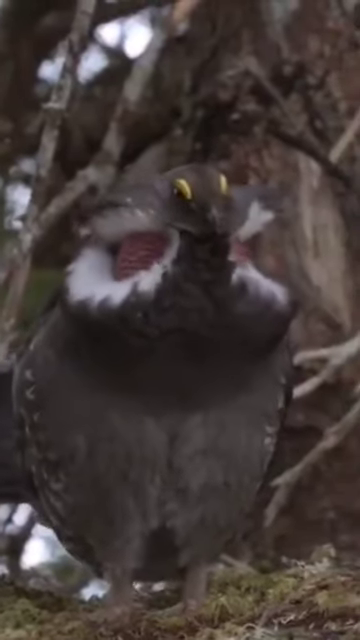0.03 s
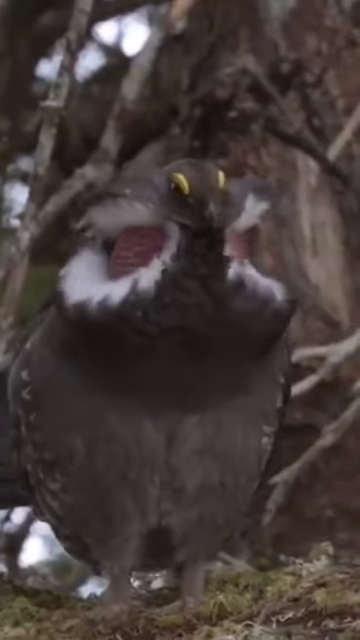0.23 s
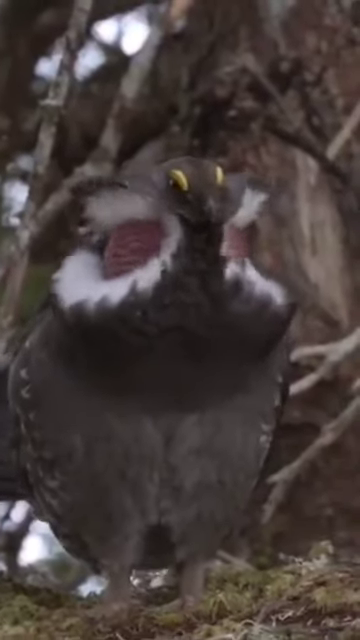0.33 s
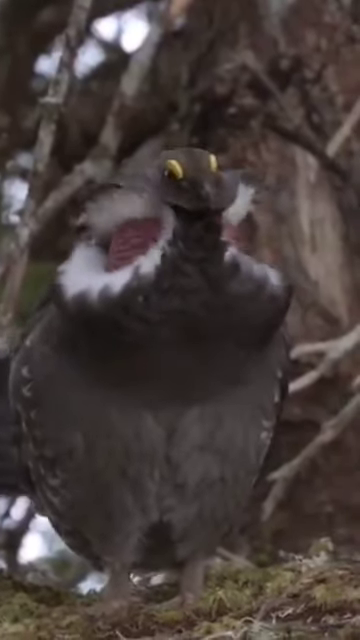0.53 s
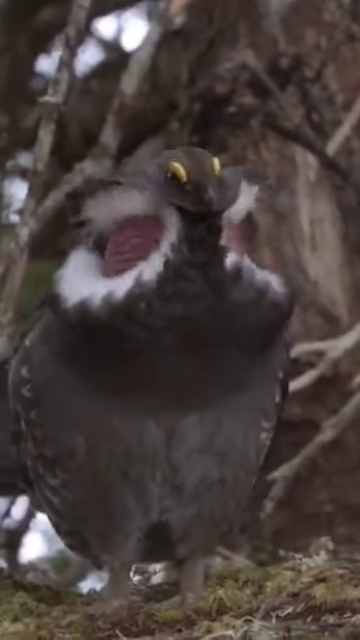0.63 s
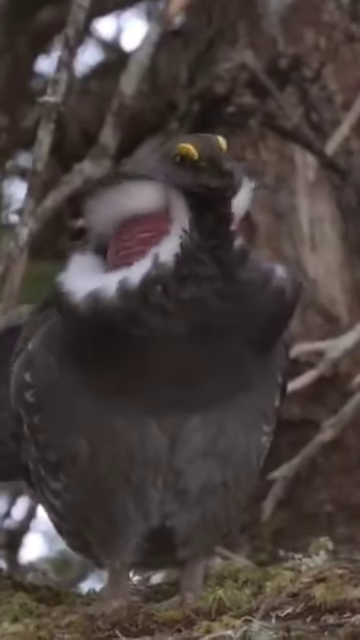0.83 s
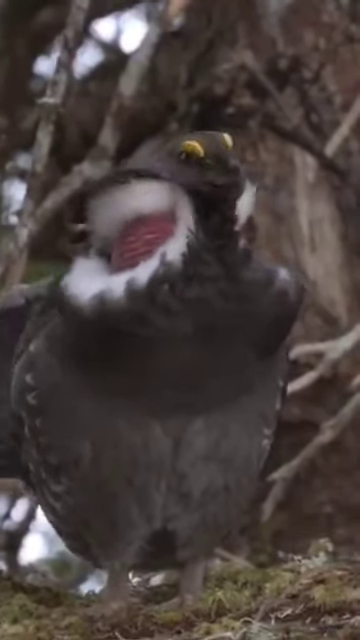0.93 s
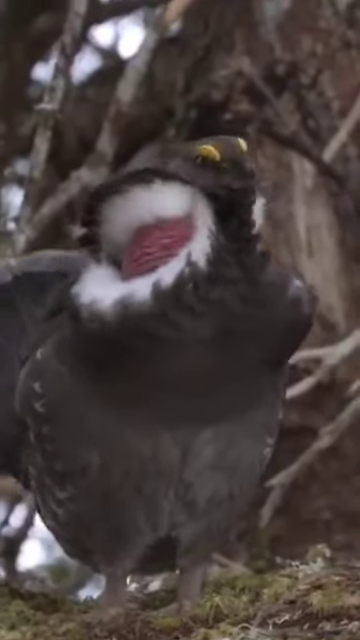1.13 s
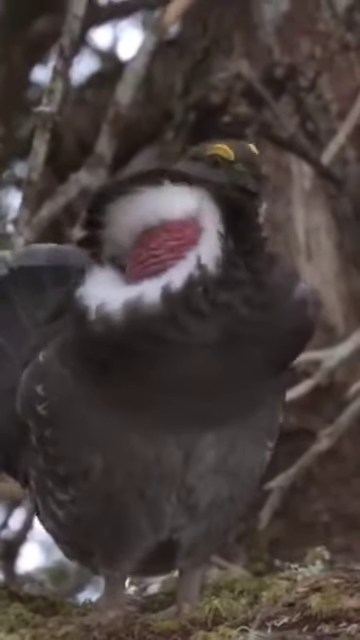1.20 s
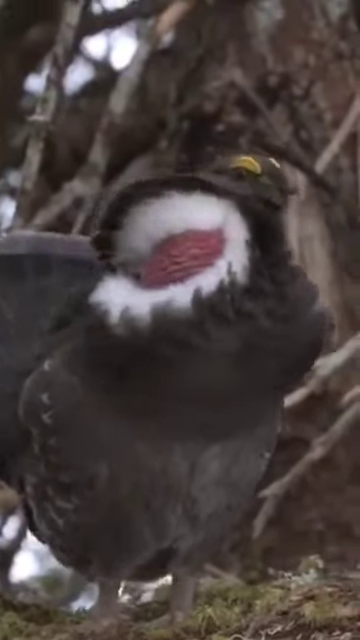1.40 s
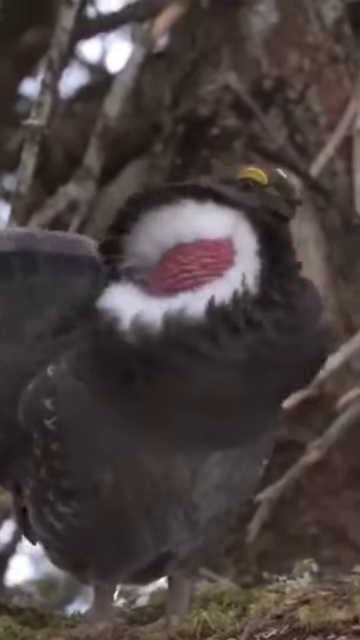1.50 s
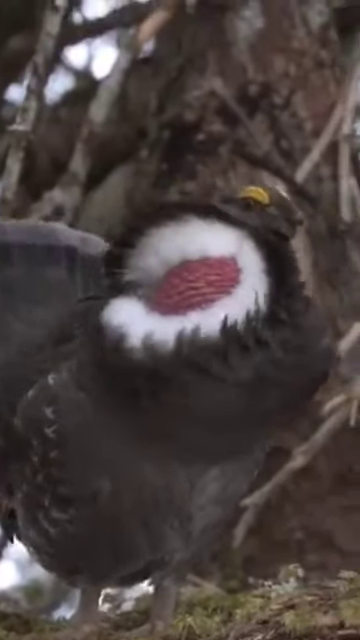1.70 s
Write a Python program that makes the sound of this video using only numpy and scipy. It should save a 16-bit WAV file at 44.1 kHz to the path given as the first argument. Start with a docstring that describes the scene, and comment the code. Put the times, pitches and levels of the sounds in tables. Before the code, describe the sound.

Two soft, deep grouse hoots, followed by a low gust buffeting the microphone.

```python
"""Hooting grouse and a gust

Close by, a grouse gives two soft, deep, almost pure hoots from its air sacs; the trees echo faintly.
Then a gust hits the microphone, mostly on its right side, in low rumbling thumps.
Behind it all: the steady rush of the forest, two thin whistles of a far bird and rustling feathers."""
import sys
import numpy as np
from scipy import signal
from scipy.fft import rfft, irfft
from scipy.io import wavfile
from scipy.ndimage import uniform_filter1d

SR = 44100
rng = np.random.default_rng(int(sys.argv[2]) if len(sys.argv) > 2 else 0)


def master(y):
    """Save y as 16-bit WAV."""
    cut = np.clip(np.atleast_2d(y).T, -1, 1)
    pcm = np.round(cut * 32767)  # scale
    wavfile.write(sys.argv[1], SR, pcm.astype(np.int16))


N = 77175

# The tone of the forest's rush, from bass to treble: frequency_hz, relative_level_db
FOREST_TONE = [(20, 4.5), (80, 2), (150, -8), (260, -4), (350, -2.5), (500, -1), (650, -4.5), (800, -4),
               (1250, -8), (2000, -14.5), (2900, -20), (4100, -26.5), (6000, -31), (10000, -34),
               (13000, -36.5), (15400, -37.5)]
# How alike that rush is on the left and right: frequency_hz, likeness_0_to_1
FOREST_LIKENESS = [(50, 0.8), (150, 0.6), (350, 1), (640, 0.82), (1400, 0.4), (3000, 0.1), (6000, .05),
                   (15000, .2)]
# The far bird's whistles: start_s, length_s, pitch_hz, level_db
WHISTLE_NOTES = [(-.06, 0.15, 2934, -57.5), (0.541, 0.085, 2813, -60)]
# Rustles of feathers: middle_s, half_length_s, frequency_hz, level_db
FEATHER_RUSTLES = [(.38, .014, 8500, -63.5), (1.182, .014, 14000, -65), (1.24, 0.028, 7500, -69),
                   (1.595, 0.025, 10000, -66), (1.635, 0.021, 8950, -65.5)]
# How hard the wind blows on the microphone: time_s, level_db
GUST_STRENGTH = [(0, -43.5), (.26, -33), (.45, -49), (.85, -44.5), (.89, -21.5), (.955, -33), (1.04, -22.5),
                 (1.11, -18), (1.145, -24.5), (1.19, -14), (1.29, -19), (1.35, -22.5), (1.43, -23.5),
                 (1.532, -31.5), (1.558, -23), (1.61, -21), (1.65, -27.5), (1.75, -29)]
# The tone of the wind's rumble: frequency_hz, relative_level_db
WIND_TONE = [(10, -22), (25, -6), (55, 4.5), (85, -0.5), (140, -4.5), (200, -11), (300, -26), (450, -33.5),
             (900, -58), (3000, -95)]
# Swirls of air that thump the right side: middle_s, thump_db, pitch_hz, churn_db
AIR_SWIRLS = [(0.9267, -3.5, 72.6, -19.5), (1.010, -10, 77, -26.5), (1.201, -10.5, 87, -26.5),
              (1.259, -16.5, 92, -24.5), (1.275, -7.5, 141, -25.5), (1.298, -14, 85, -29.5),
              (1.479, -6, 68, -21.5), (1.704, -9, 167, -26.5)]
# One list per hoot, the first just a hoot's dying end: time_s, pitch_hz, relative_level_db
HOOT_SHAPES = [
    [(0, 199, -25.5), (.02, 192, -34), (.045, 196.5, -55)],
    [(.212, 169.2, -43.5), (.229, 173.4, -17), (.243, 173.6, -13), (.278, 169.1, -19), (.305, 179.4, -14),
     (.345, 185.9, -8.5), (.366, 185.8, -7.5), (.386, 184.3, -10), (.396, 187, -16), (.404, 208.3, -28),
     (.422, 190, -25.5), (.452, 197, -48)],
    [(.612, 168.9, -41.5), (.633, 172, -16), (.65, 179, -13.3), (.695, 182.8, -10), (.72, 180.8, -12.5),
     (.742, 176.4, -18.5), (.76, 162, -31.5), (.79, 168, -43.5)],
]

ECHO_FADE_S = 1  # time for an echo to fall by 60 dB


def amp(db):
    """Turns decibels into a number to multiply by."""
    return 10 ** (np.asarray(db) / 20)


def unit(x):
    """Scales a signal to an average (rms) strength of 1."""
    return x / np.sqrt(np.mean(x ** 2) + 1e-20)


def clock():
    """The time of every sample, in seconds."""
    return np.arange(N) / SR


def frequencies():
    """Every frequency in the sound's spectrum, in Hz."""
    return np.fft.rfftfreq(N, 1 / SR)


def curve(points):
    """Joins a table's points to give a value at every frequency."""
    hz, value = np.transpose(points)
    return np.interp(np.log(frequencies() + 1), np.log(hz + 1), value)


def noise(tone):
    """Noise of strength 1; tone sets the share of each frequency."""
    return unit(irfft(rfft(rng.standard_normal(N)) * tone, N))


def noise_band(hz, width_hz):
    """Noise gathered around one frequency."""
    return noise(np.exp(-((frequencies() - hz) / width_hz) ** 2))


def drift(rate_hz):
    """A random wander, quicker at a higher rate."""
    return noise_band(0, rate_hz)


def forest(level_db=-41, swell_db=-0.2):
    """A far, steady rush, alike on both sides in the bass but not in the treble."""
    left, other = rfft(rng.standard_normal((2, N)))
    likeness = np.clip(curve(FOREST_LIKENESS), 0, 1)
    right = likeness * left + np.sqrt(1 - likeness ** 2) * other
    rush = unit(irfft(np.array([left, right]) * amp(curve(FOREST_TONE)), N))
    return amp(level_db + swell_db * drift(7)) * rush


def far_bird(wobble=0.004):
    """Thin whistles, each near one pitch, blurred by distance."""
    out = np.zeros((2, N))
    for start_s, length_s, hz, db in WHISTLE_NOTES:
        progress = np.clip((clock() - start_s) / length_s, 0, 1)
        arch = np.sqrt(abs(np.sin(np.pi * progress)))
        for side in out:
            pitch = hz * (1 + wobble * drift(80))
            side += amp(db) * np.sqrt(2) * arch * np.sin(2 * np.pi * np.cumsum(pitch) / SR)
    return out


def feathers(grain_db=3, width_octaves=0.45):
    """Brief, grainy swishes as the grouse puffs up and turns."""
    out = np.zeros((2, N))
    for middle_s, half_length_s, hz, db in FEATHER_RUSTLES:
        band = np.exp(-(np.log2((frequencies() + 1) / hz) / width_octaves) ** 2 / 2)
        swell = np.exp(-((clock() - middle_s) / half_length_s) ** 2)
        level = amp(db + grain_db * drift(300)) * swell
        out += level * np.array([noise(band), noise(band)])
    return out


def wind(shelter_db=-4, shelter_hz=132):
    """Rough air rumbles on each side of the microphone; the sheltered left is softer and duller."""
    level = amp(np.interp(clock(), *np.transpose(GUST_STRENGTH)))
    tone = amp(curve(WIND_TONE))
    left = amp(shelter_db) * noise(tone / np.hypot(1, frequencies() / shelter_hz))
    right = noise(tone)
    return level * np.array([left, right])


def wind_thumps(fade_cycles=0.42, steepen=0.14, churn_s=0.007, cutoff_hz=380):
    """Each swirl of air is one steep, short swing of pressure with finer churning inside."""
    right, t = np.zeros(N), clock()
    for middle_s, thump_db, hz, churn_db in AIR_SWIRLS:
        cycles = (t - middle_s) * hz
        angle = 2 * np.pi * cycles
        fade = np.exp(-np.hypot(cycles, 0.1) / fade_cycles)
        swing = fade * np.sin(angle + steepen * np.sin(angle))
        churn = np.exp(-((t - middle_s) / churn_s) ** 2) * noise_band(hz=217, width_hz=187)
        right += amp(thump_db) * swing / abs(swing).max() + amp(churn_db) * churn
    muffle = 1 / np.hypot(1, (frequencies() / cutoff_hz) ** 6)
    return np.array([np.zeros(N), irfft(rfft(right) * muffle, N)])


def lingering_echo(level_db=-41):
    """The hum of earlier hoots, still dying away among the trees."""
    return amp(level_db - 60 * clock() / ECHO_FADE_S) * noise_band(hz=186, width_hz=11)


def tree_echoes(sound, level_db=-30.5, delay_s=0.014):
    """Tree trunks scatter a sound into a fading tail of echoes."""
    t = clock()
    tail = rng.standard_normal(N) * amp(-60 * t / ECHO_FADE_S) * (t > delay_s)
    return amp(level_db) * signal.fftconvolve(sound, tail / np.linalg.norm(tail))[:N]


def hoot(shape, gain_db=-0.5, octave_db=-41, wobble=0.0046):
    """The grouse's air sacs ring with an almost pure tone whose pitch rises as it swells."""
    times, hz, db = np.transpose(shape)
    pitch = uniform_filter1d(np.interp(clock(), times, hz), size=300) * (1 + wobble * drift(60))
    before_db = db[0] if times[0] < 0.1 else -120  # a hoot at the very start is already sounding
    level = amp(np.interp(clock(), times, db, left=before_db, right=-120))
    smooth_level = uniform_filter1d(level, size=260)
    angle = 2 * np.pi * np.cumsum(pitch) / SR
    tone = np.sin(angle) + amp(octave_db) * np.sin(2 * angle)
    return np.sqrt(2) * amp(gain_db) * smooth_level * tone


def scene(right_delay_s=0.00008):
    """Birds and forest reach the left side slightly first; the wind hits the microphone directly."""
    grouse = sum(hoot(shape) for shape in HOOT_SHAPES)
    air = grouse + tree_echoes(grouse) + lingering_echo() + forest() + far_bird() + feathers()
    delay = np.exp(-2j * np.pi * frequencies() * np.array([[0], [right_delay_s]]))
    return irfft(rfft(air) * delay, N) + wind() + wind_thumps()


def record(dry, cutoff_hz=15480):
    """Cuts away the very highest treble."""
    treble_cut = signal.firwin(511, cutoff_hz, window=("kaiser", 9), fs=SR)
    return signal.oaconvolve(dry, treble_cut[None], "same", axes=1)


dry = scene()
out = record(dry)
master(out)
```